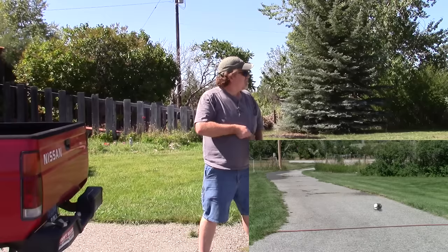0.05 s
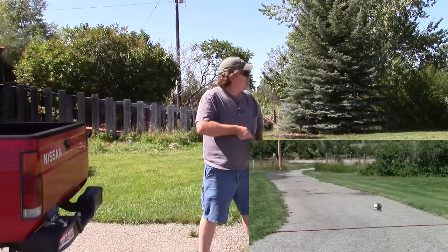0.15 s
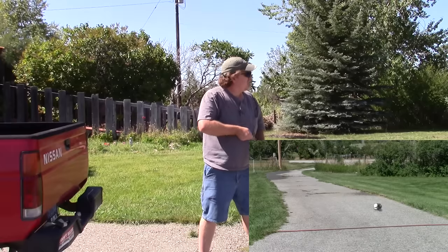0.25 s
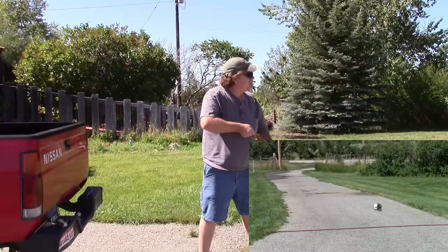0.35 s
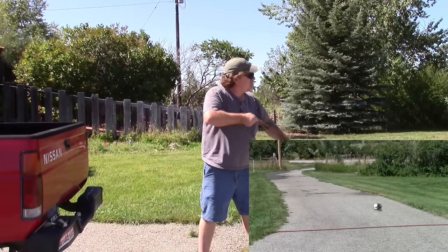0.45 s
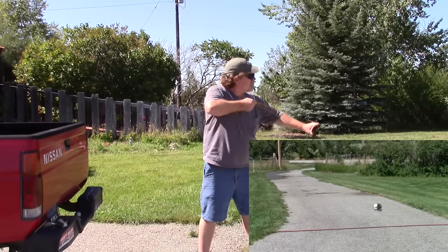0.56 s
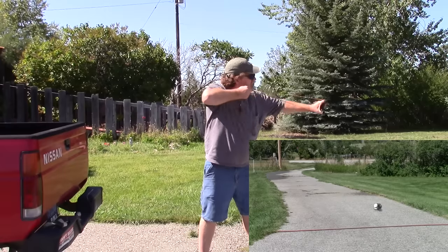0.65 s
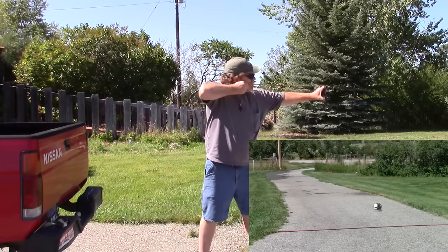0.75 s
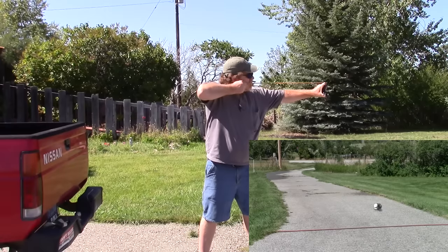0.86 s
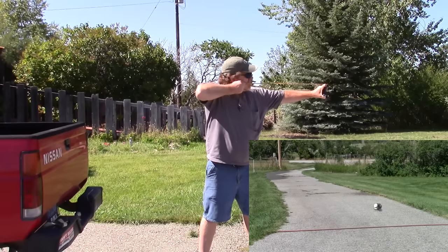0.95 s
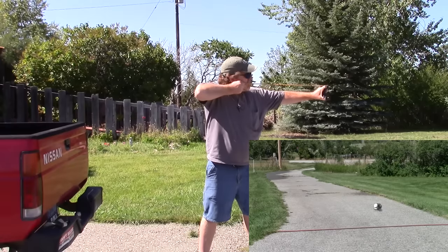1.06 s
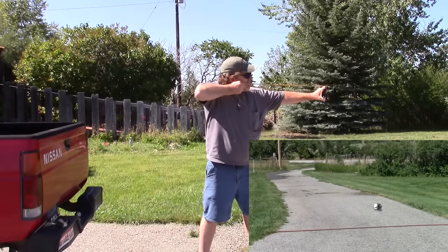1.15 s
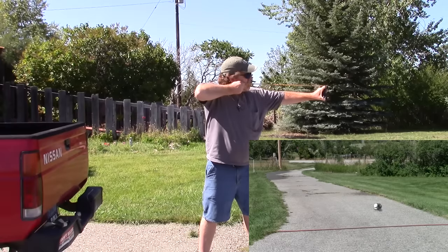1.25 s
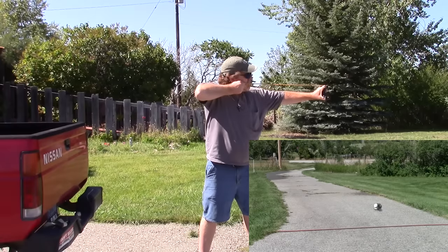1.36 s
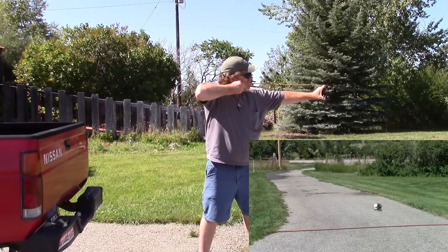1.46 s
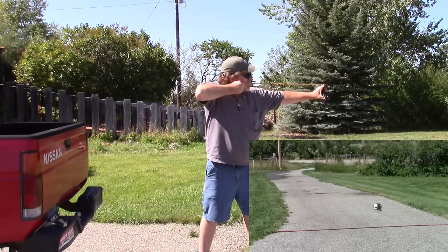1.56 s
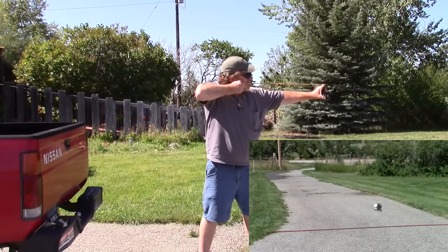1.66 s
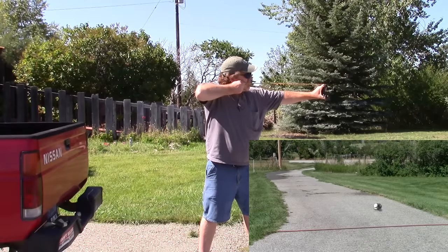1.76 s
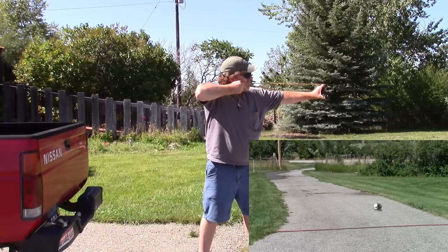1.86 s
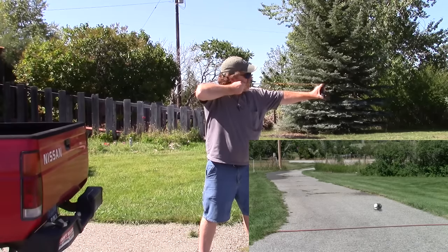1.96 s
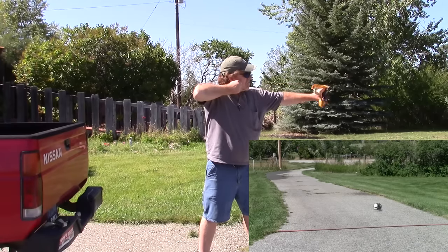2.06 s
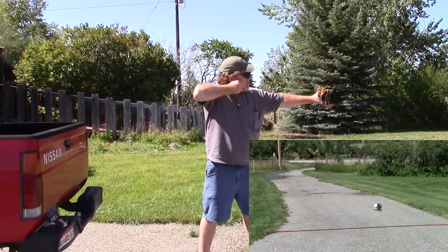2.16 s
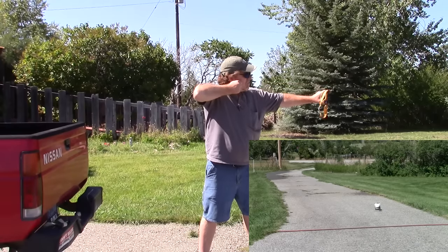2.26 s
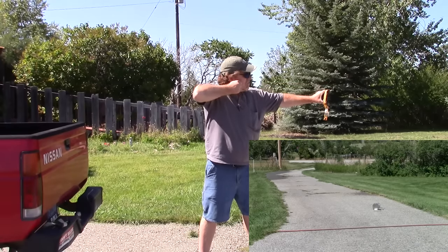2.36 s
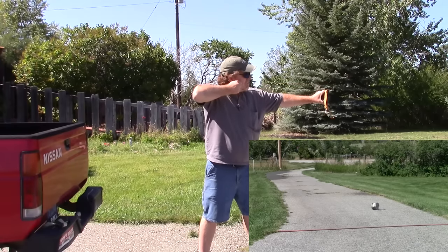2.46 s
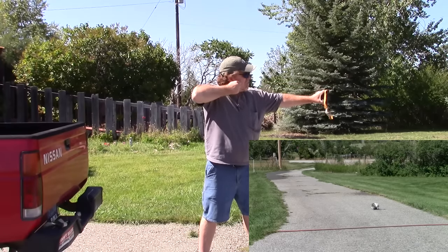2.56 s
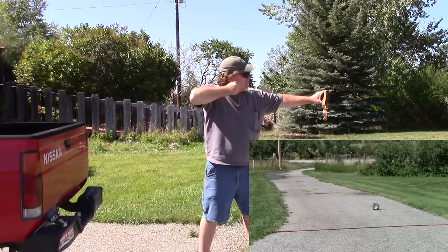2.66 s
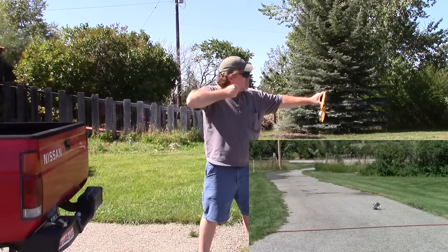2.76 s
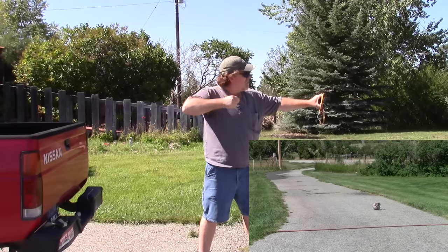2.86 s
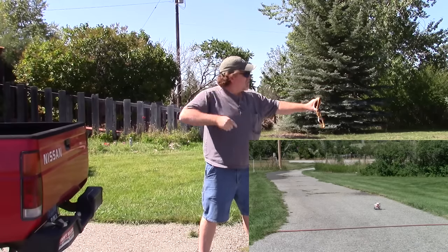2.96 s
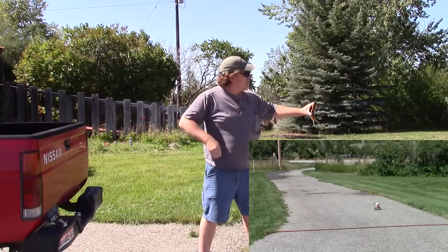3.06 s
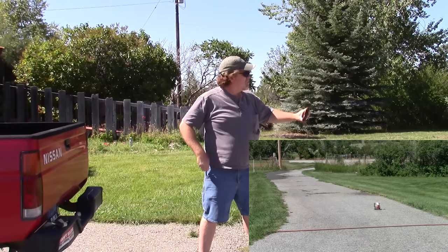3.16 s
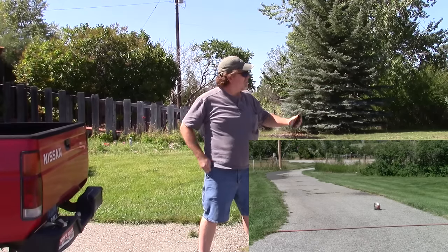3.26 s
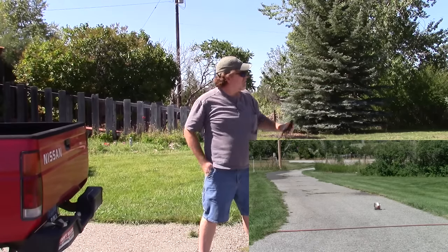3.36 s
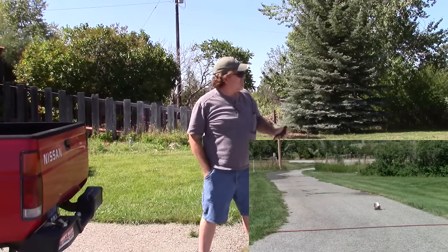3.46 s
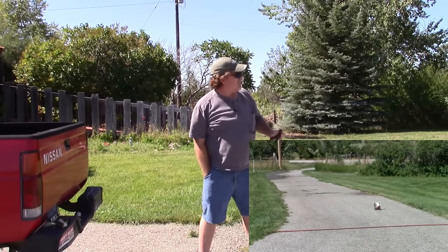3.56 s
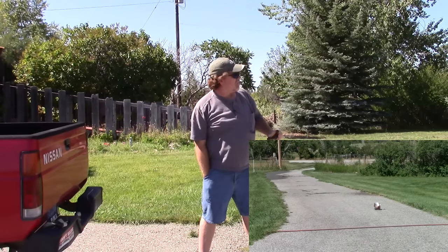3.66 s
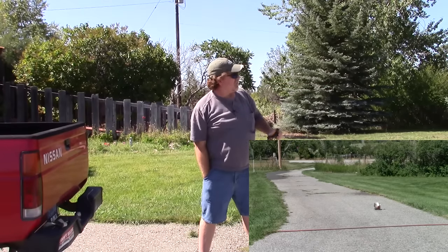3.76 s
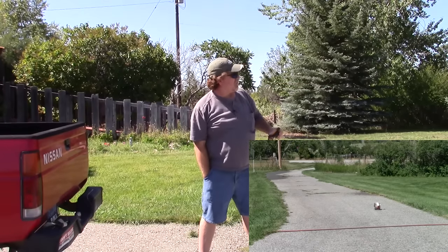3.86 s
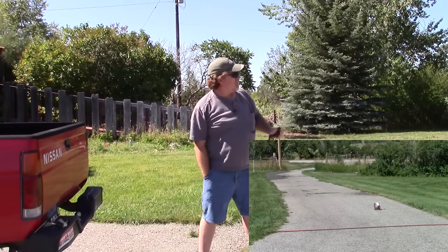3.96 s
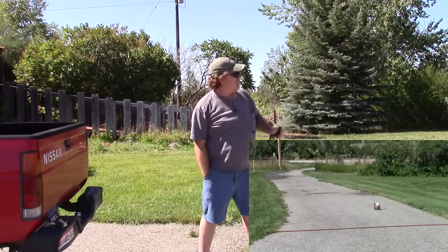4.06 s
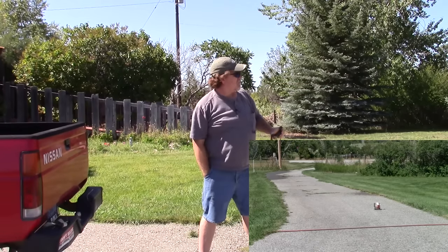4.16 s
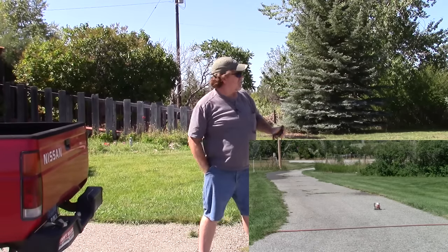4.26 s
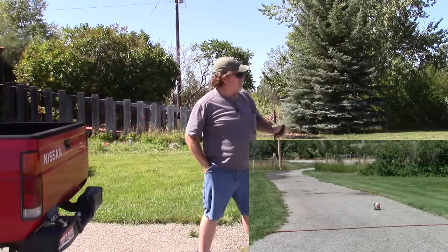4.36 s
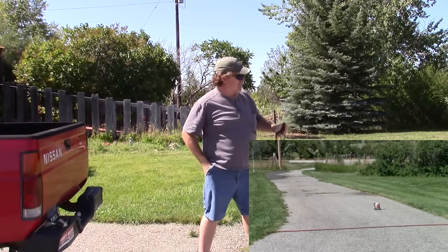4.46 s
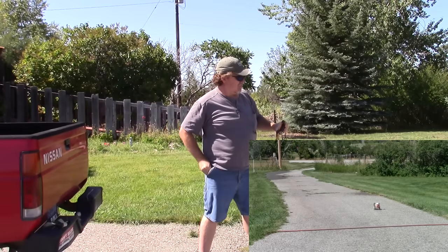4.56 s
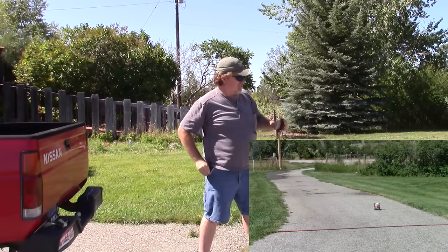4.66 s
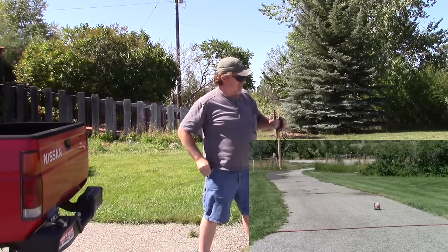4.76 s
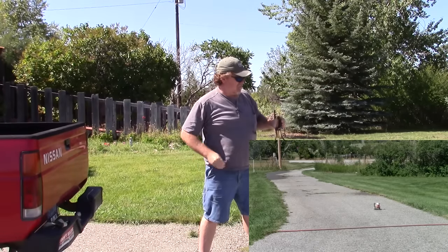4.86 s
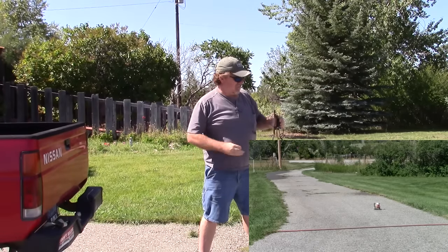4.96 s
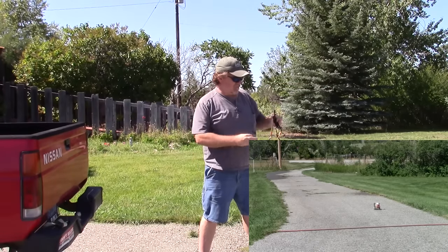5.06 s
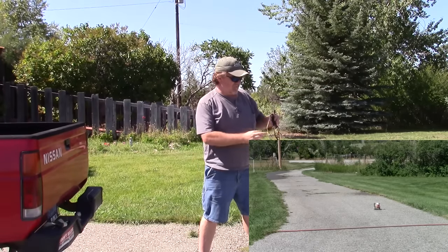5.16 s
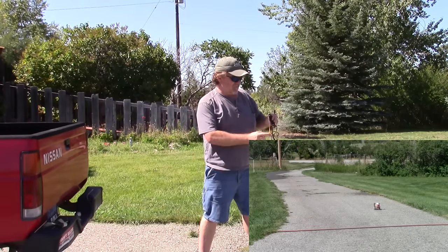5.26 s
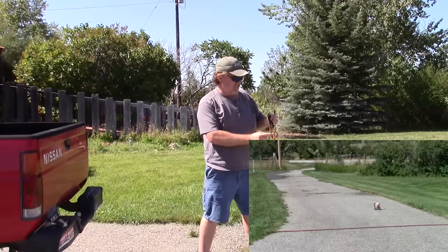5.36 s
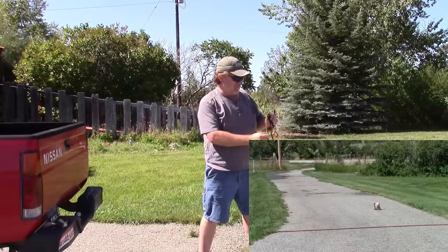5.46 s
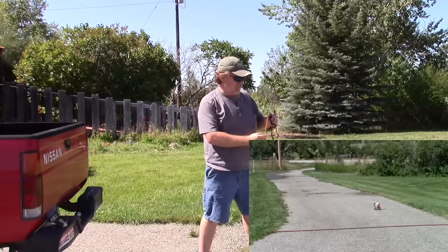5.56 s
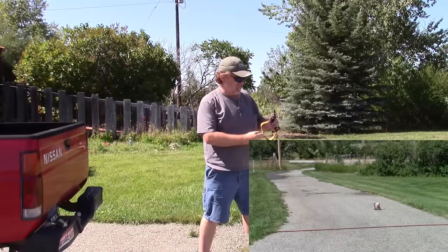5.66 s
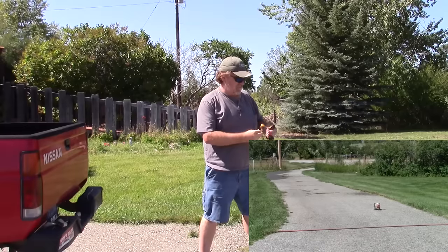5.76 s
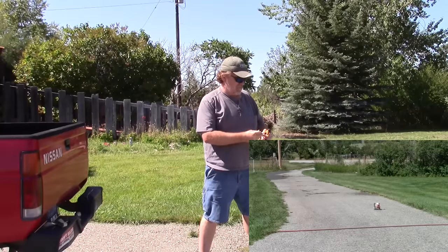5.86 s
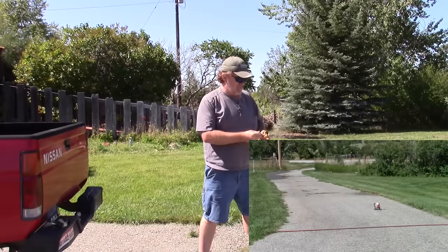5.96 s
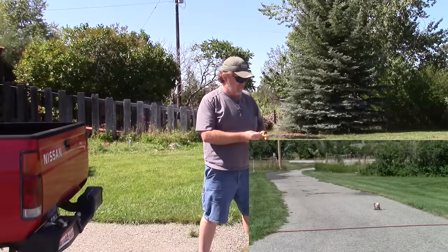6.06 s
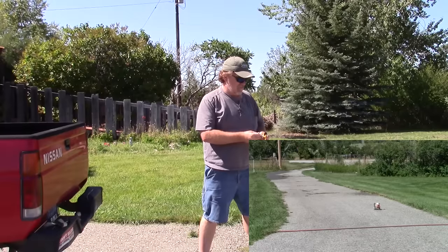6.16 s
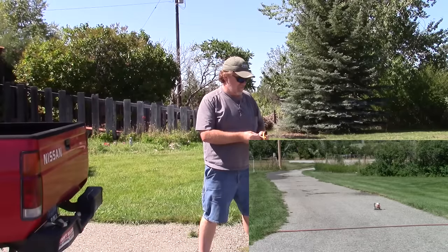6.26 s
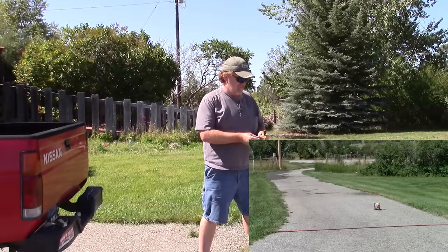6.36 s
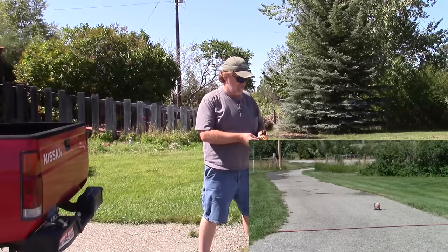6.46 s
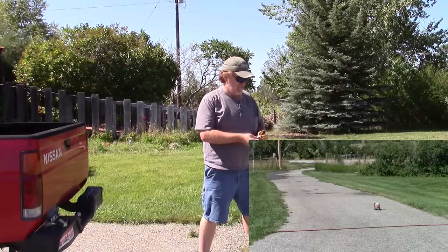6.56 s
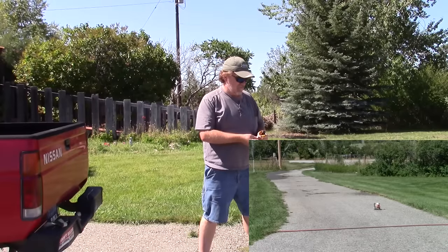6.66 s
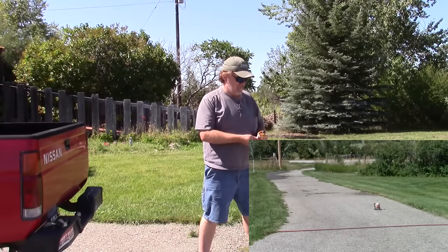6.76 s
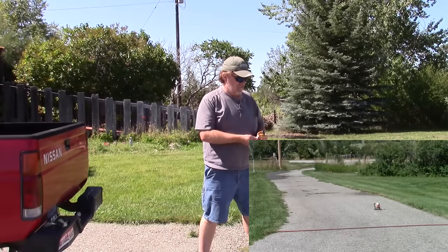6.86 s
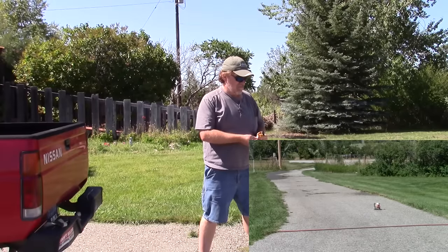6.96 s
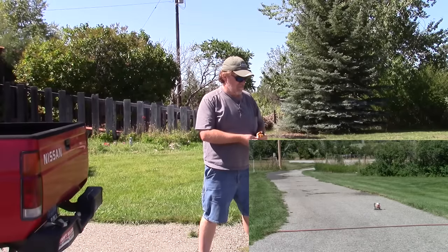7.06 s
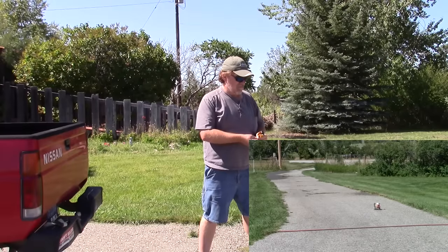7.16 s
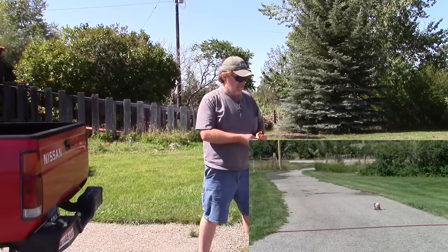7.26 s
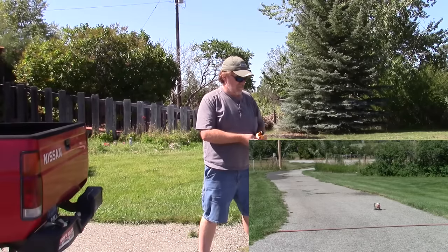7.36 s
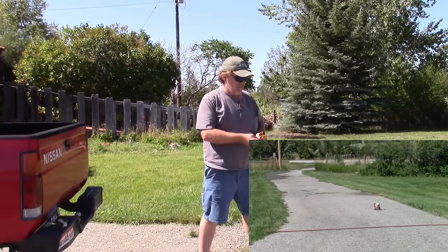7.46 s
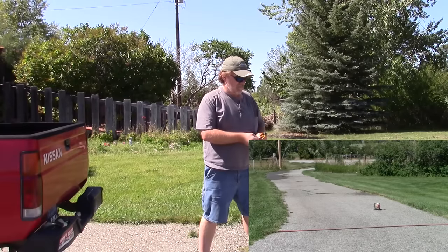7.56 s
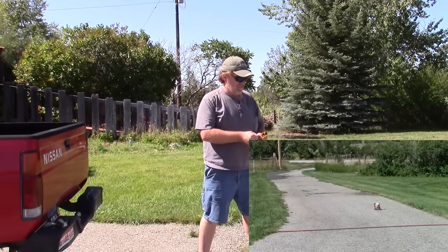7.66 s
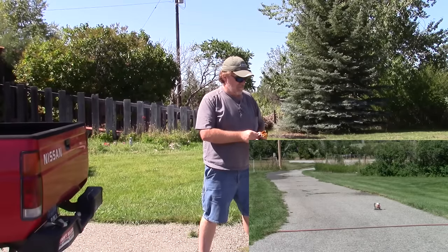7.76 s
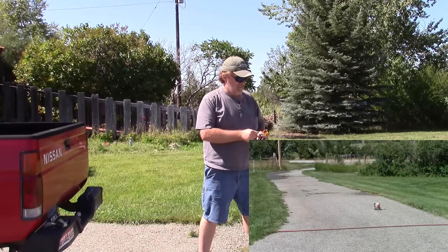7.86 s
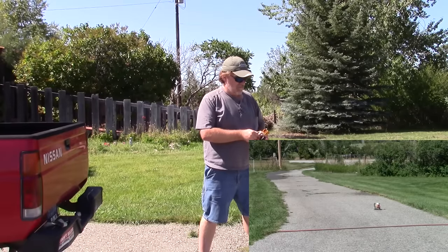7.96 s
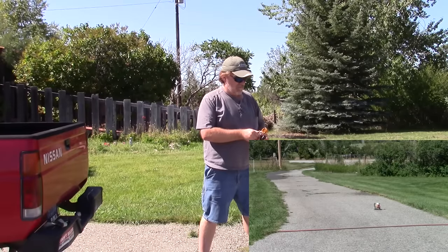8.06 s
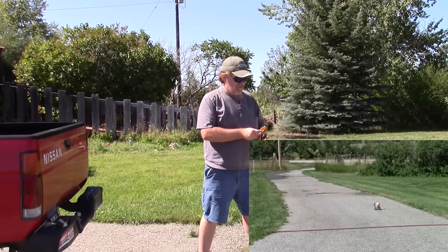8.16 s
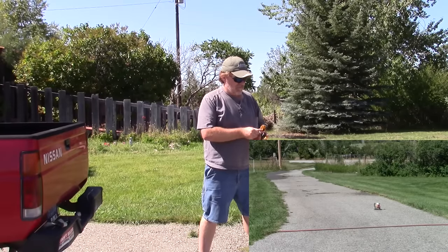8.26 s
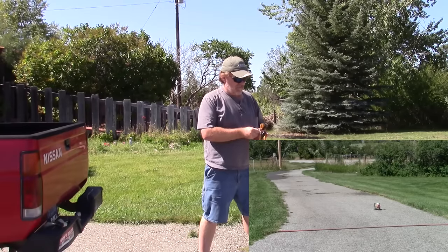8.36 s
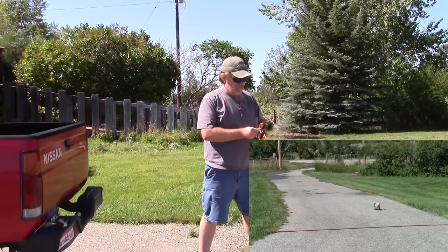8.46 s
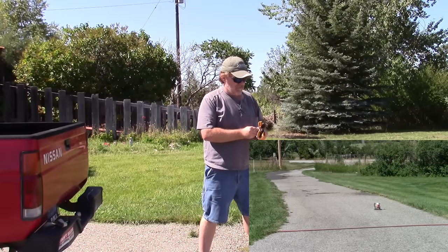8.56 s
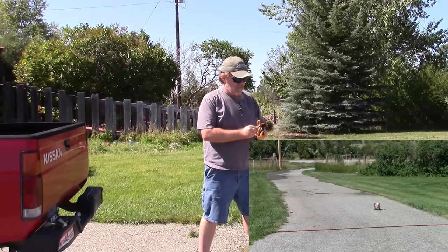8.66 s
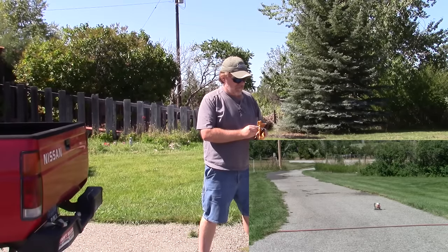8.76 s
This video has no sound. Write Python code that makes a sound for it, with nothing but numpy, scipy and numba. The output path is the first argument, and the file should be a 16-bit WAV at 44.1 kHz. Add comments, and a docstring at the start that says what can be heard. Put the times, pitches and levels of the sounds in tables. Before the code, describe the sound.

In a garden, an impact sprinkler ticks softly and quickly while a distant vehicle rumbles away. About two seconds in, a slingshot fires close to the microphone with a loud crack and slap. The shot clangs against a thin metal can, which tumbles and rocks to rest on the driveway. The background dips and slowly returns, with faint bird twittering, slight rustling and a few low puffs of wind.

```python
"""An impact sprinkler ticks in a garden, over the rumble of a vehicle driving off along a distant road.
Two seconds in, a slingshot fires close to the microphone: the bands crack and the pouch slaps. The shot
hits a can on the drive, whose thin shell rings as it tumbles and rocks to rest. The crack overloads the
input, and the gain control ducks and slowly recovers. The sprinkler ticks on, with faint twittering
far off, a little handling rustle and a few puffs of wind on the microphone."""
import sys
import numpy as np
from scipy import signal
from scipy.fft import rfft, irfft, next_fast_len
from scipy.io import wavfile
from scipy.ndimage import uniform_filter1d
from numba import njit

SR = 44100
rng = np.random.default_rng(int(sys.argv[2]) if len(sys.argv) > 2 else 0)


def inscribe(sig):
    """Save sig as 16-bit PCM at rate SR to the path in sys.argv[1].

    A 1-D sig is mono; a 2-D sig holds one channel per row.
    Samples are clipped to [-1, 1] before scaling.
    """
    pcm = np.round(np.clip(np.atleast_2d(sig).T, -1, 1) * 32767)
    wavfile.write(sys.argv[1], SR, pcm.astype(np.int16))


N = 388962
TIME = np.arange(N) / SR
AFTER = TIME[:SR // 2]  # time since a blow

# Levels in the tables are relative, ahead of the gain control.
# modes of the bands' crack: pitch_hz, level_db, t60_s
CRACK_MODES = [(19, -15, 0.23), (59, -17.5, .045), (406, -17, 0.026), (1024, -10.5, .012),
               (2010, 4, 0.0061), (3600, 8.5, 0.0032), (7400, -6.5, 0.0023)]
# pouch and bands flapping against fork and hand, then a few later thuds of another kind: start_s, level_db,
# t60_s, cutoff_hz
SLAPS_AND_THUDS = [(2.0255, -35, 0.004, 11970), (2.039, -43, 0.025, 11810), (2.0729, 1.5, 0.034, 15700),
                   (2.0845, -15.5, .008, 12000), (2.0897, -21, .09, 3800), (2.114, -24.5, 0.0088, 4000),
                   (2.171, -30, 0.015, 9000), (2.197, -39, 0.016, 4010), (2.931, -30.5, 0.018, 550),
                   (2.966, -38, 0.021, 3970), (2.973, -32, .02, 702), (4.414, -41, 0.047, 597)]
# the can is struck, then bounces: start_s, level_db, wall_note_db, crunch_db
CAN_KNOCKS = [(2.3385, 0, 7.5, 4.5), (2.385, -31, -20, 16), (2.412, -13.5, -24, -31),
              (2.504, -10, -25, -22), (2.5725, -15, 1.5, -17), (2.624, -22.5, -18, -16),
              (2.6545, -23, -17, -13), (3.178, -23.5, 4, -19), (3.211, -26, 4, -16),
              (3.234, -28.5, -15, -14)]
# modes of the can's shell: pitch_hz, level_db, t60_s
CAN_MODES = [(495, -9, 0.091), (518, -6, 0.063), (563, -1.5, 0.075), (851, -10.5, 0.13), (974, -17, 0.14),
             (1057, -16, 0.14), (1234, -20.5, 0.13), (1456, -13, .09), (1554, -25, 0.27), (1690, -20, 0.21),
             (2060, -28, 0.16), (2350, -30, 0.24), (2350, -15, 0.12), (2780, -26, 0.085),
             (2980, -21, 0.097), (4250, -31, .14), (5370, -15.5, 0.054)]
# sprinkler strokes as the jet turns away and back: time_s, level_db
STROKE_LEVELS = [(0, -39.5), (2, -42.5), (3.6, -39), (8.8, -38.5)]
# resonances of the sprinkler head: pitch_hz, width_hz, level_db
HEAD_MODES = [(2870, 92, -4.5), (3050, 60, 5), (3570, 27, -8.5), (4770, 80, 0.5), (4680, 77, 0.5),
              (5307, 25, 3), (5500, 46, 1), (5700, 69, 0), (6260, 67, -1.5), (7480, 40, -6)]
# tyre roar sinking into that of other roads: time_s, level_db, centre_hz
TYRE_ROAR = [(0, -39.5, 1064), (.15, -37.5, 1010), (.38, -41.5, 1090), (.68, -40, 865), (.88, -40, 1230),
             (1.15, -44, 1230), (1.68, -47.5, 740), (1.92, -43, 880), (2.85, -52, 836), (4.6, -53, 888),
             (5.2, -55, 910), (8.8, -54.5, 840)]
# wind buffeting the microphone: peak_s, level_db
WIND_PUFFS = [(0.80, -24), (0.984, -29), (5.99, -34), (6.558, -36.5), (7.046, -39.5)]
# bands and clothing being handled: peak_s, half_width_s, level_db, centre_hz
HANDLING_RUBS = [(0.5, .25, -59, 3990), (0.602, 0.055, -54.5, 8800), (0.705, 0.041, -54.5, 10500),
                 (6.05, .06, -65, 6930), (8.78, 0.041, -60, 9000)]

# noise spectra, each with the columns: frequency_hz, density_db
SLAP_SPECTRUM = [(60, 2.5), (330, -0.5), (1000, 3.5), (2000, -6), (3500, -2), (5300, -5), (6300, 5.5),
                 (8000, 0), (11000, -4), (16000, -8.5)]  # leather and rubber
CRUNCH_SPECTRUM = [(250, -12.5), (500, 10), (1100, -6), (1600, 5.5), (2400, 2.5), (3400, -4), (4200, -10.5),
                   (5400, -9.5), (9000, -16), (15000, -33)]  # crumpling metal
JET_SPECTRUM = [(600, -27.5), (1300, -2), (2200, -14.5), (2500, -3.5), (3100, -3), (4100, -6.5), (5400, -3),
                (7000, -4), (9800, -10.5), (10800, -15.5), (15500, -24)]  # water jet on the arm
SPRAY_SPECTRUM = [(1000, -12), (2200, -3), (2900, 0), (4000, -3.5), (6800, -3.5), (9000, -9.5), (12000, -9),
                  (16000, -7.5)]  # airborne spray
PATTER_SPECTRUM = [(1800, -23.5), (2600, 1), (3100, 2.5), (4000, -8), (5500, -4.5), (7500, -2), (9500, -12),
                   (15000, -24)]  # water on leaves
RUSTLE_SPECTRUM = [(1500, -12.5), (3500, -2), (6000, -1), (9500, 0), (12000, -8), (16000, -13.5)]  # cloth, also single drops
ENGINE_SPECTRUM = [(15, -4.5), (35, -2.5), (65, -2), (120, -1), (190, -3), (280, -12.5), (450, -25.5),
                   (900, -56.5)]  # distant engine
TYRE_SPECTRUM = [(200, -24.5), (400, -7.5), (600, 0), (900, -5.5), (1400, -3.5), (1800, -9.5),
                 (2300, -15.5), (4000, -27.5), (9000, -41)]  # tyres on the road
DRONE_SPECTRUM = [(15, -0.5), (40, 2), (62, 2), (100, 1.5), (135, -10.5), (200, -17), (320, -25),
                  (480, -21.5), (800, -34), (2000, -57.5)]  # far roads and breeze


def band_crack(start_s=2.0604, level_db=4):
    """Close to the microphone the bands whip past the fork: a ringing crack, hiss and a push of air."""
    body = sum((-1) ** k * undb(db) * ring(hz, t60) for k, (hz, db, t60) in enumerate(CRACK_MODES))
    attack = 1 - np.exp(-AFTER / .00032)
    hiss = noise(SLAP_SPECTRUM, len(AFTER)) * (undb(-6) * fade(.004) + undb(-22.5) * fade(.036))
    out = np.zeros(N)
    add(out, start_s, undb(level_db) * (body * attack + hiss))
    return out


def slaps_and_thuds(grain_db=3.5):
    """Leather and rubber smack: short, broad bursts that crackle as the folds close; a few duller thuds follow
    later."""
    out = np.zeros(N)
    for start_s, db, t60, cutoff_hz in SLAPS_AND_THUDS:
        folds = undb(grain_db * walk(1200)[:len(AFTER)])
        burst = lowpass(noise(SLAP_SPECTRUM, len(AFTER)) * folds, cutoff_hz)
        add(out, start_s, undb(db) * unit(burst) * fade(t60))
    return out


def can(wall_hz=684, dented_hz=722, strike_cutoff_hz=8960, bounce_cutoff_hz=880):
    """Out on the drive each knock rings and crunches the thin shell; the dent raises the wall's note."""
    out = np.zeros(N)
    for k, (start_s, db, wall_db, crunch_db) in enumerate(CAN_KNOCKS):
        bounce = k > 0
        # every bounce lands on another spot, which reweights and shifts the modes
        spot = rng.standard_normal((len(CAN_MODES), 2)) * bounce
        shell = sum(undb(mode_db + 3 * weight) * ring(hz * (1 + .015 * shift), t60)
                    for (hz, mode_db, t60), (weight, shift) in zip(CAN_MODES, spot))
        wall = undb(wall_db - 11.5) * ring(dented_hz if bounce else wall_hz, t60=.3)
        crunch = undb(crunch_db) * noise(CRUNCH_SPECTRUM, len(AFTER)) * fade(.033)
        clang = lowpass(shell + wall, bounce_cutoff_hz if bounce else strike_cutoff_hz)
        give = 1 - np.exp(-AFTER / .0023)  # the shell gives before it springs back
        add(out, start_s, undb(db) * give * (clang + crunch))
    # so small a body radiates little bass
    return signal.sosfilt(signal.butter(4, 335, "high", fs=SR, output="sos"), out)


def sprinkler(first_s=.0262, period_s=.13506, gained_s=.0146, settle_strokes=10):
    """The arm splashes once as it cuts into the jet and again as it strikes the head, amid spray."""
    stroke_db, = curves(STROKE_LEVELS)
    count = np.arange(int(N / SR / period_s) + 1)
    # the arm starts a little fast and settles into an even beat
    starts = first_s + period_s * count - gained_s * (1 - np.exp(-count / settle_strokes))
    strokes = np.zeros(N)
    for start_s in starts:
        force, lag, rebound = rng.standard_normal(3)
        second_splash = undb(-7.5 + .91 * rebound) * fade(.064, delay_s=.007 + .00036 * lag)
        add(strokes, start_s, undb(.54 * force) * (fade(.025) + second_splash))
    jet = noise(JET_SPECTRUM) * uniform_filter1d(strokes, size=70) * undb(stroke_db)
    # the head rings at the same pitches, but no two strokes excite them alike
    head = sum(undb(db + 3.7 * walk(11)) * resonate(jet, np.full(N, float(hz)), float(width))
               for hz, width, db in HEAD_MODES)
    # reflections from the ground nearby comb the splash
    ticks = garden(jet + .55 * head, wet_db=-6.5, t60=.05, cutoff_hz=18000, delay_s=.00078)
    return ticks + spray(stroke_db - 25)


def spray(level_db, drops_per_s=14):
    """Flung water hisses, then lands on the leaves in uneven showers and single drops."""
    hiss = noise(SPRAY_SPECTRUM) * undb(level_db + .63 * walk(50))
    showers = noise(PATTER_SPECTRUM) * undb(level_db - 8 + 6.4 * walk(38))
    landings = (rng.random(N) < drops_per_s / SR) * undb(3.5 * rng.standard_normal(N))
    splats = signal.fftconvolve(landings, fade(.0072))[:N]
    drops = splats * noise(RUSTLE_SPECTRUM) * undb(level_db + 7.5)
    return hiss + showers + drops


def vehicle(passes_s=.2, nearest_m=12, speed_m_s=13):
    """Engine rumble recedes along a straight road, under a tyre roar whose centre drifts."""
    nearness = nearest_m / np.hypot(nearest_m, speed_m_s * (TIME - passes_s))
    tyre_db, centre_hz = curves(TYRE_ROAR)
    roll = noise(TYRE_SPECTRUM)
    focus = unit(resonate(resonate(noise(TYRE_SPECTRUM), centre_hz, 480.), centre_hz, 480.))
    roar = unit(focus + .85 * roll)
    # a reflection lags ever more as the vehicle moves, sweeping notches down the roar
    lag_s = .00092 * np.exp(.6 * TIME)
    echo = np.interp(TIME - lag_s, TIME, roar)
    roar = unit(roar + .32 * nearness * echo)
    engine = noise(ENGINE_SPECTRUM) * undb(-35.5 + 21.5 * np.log10(nearness) + 1.8 * walk(12))
    return engine + roar * undb(tyre_db + .95 * walk(18))


def wind(half_width_s=.03):
    """Soft, low buffets right on the microphone."""
    rumble = noise([(15, 2), (60, 1), (130, -10), (300, -34), (1500, -74)])
    return rumble * sum(swell(peak_s, half_width_s, db) for peak_s, db in WIND_PUFFS)


def handling(slip_db=6):
    """Rubber and cloth stick and slip as they slide, each rub with its own brightness."""
    rub = noise(RUSTLE_SPECTRUM) * undb(slip_db * walk(220))
    return sum(unit(resonate(rub, np.full(N, float(hz)), .5 * hz)) * swell(peak_s, half_width_s, db)
               for peak_s, half_width_s, db, hz in HANDLING_RUBS)


def twitter(pitch_hz=2900, scatter_hz=200, chirps_per_s=17):
    """Quick, husky chirps, each at its own pitch, blurred by distance; one bout is louder."""
    out = np.zeros(N)
    envelope = fade(.05) * (1 - np.exp(-AFTER / .006))
    for k, (lag, shift, force) in enumerate(rng.standard_normal((int(chirps_per_s * N / SR), 3))):
        centre_hz = np.full(len(AFTER), pitch_hz + scatter_hz * shift)
        note = resonate(rng.standard_normal(len(AFTER)), centre_hz, 350.)
        add(out, (k + .3 * lag) / chirps_per_s, undb(2.1 * force) * note * envelope)
    distant = unit(garden(out, wet_db=-6.5, t60=.25, cutoff_hz=5000))
    return distant * (undb(-78) + swell(peak_s=5.9, half_width_s=.55, db=-64))


def far_drone(level_db=-47.5):
    """Far-off roads and breeze, still there when the vehicle has gone."""
    return noise(DRONE_SPECTRUM) * undb(level_db + 2.4 * walk(7))


def garden(x, wet_db, t60, cutoff_hz, delay_s=.006):
    """Direct sound reaches the microphone first, then scatter from ground, fence and trees."""
    scatter = lowpass(rng.standard_normal(len(AFTER)), cutoff_hz) * fade(t60, delay_s)
    scatter /= np.sqrt(np.sum(scatter ** 2))
    return x + undb(wet_db) * signal.fftconvolve(x, scatter)[:N]


def undb(db):
    """Decibels to gain."""
    return 10 ** (np.asarray(db) / 20)


def curves(rows):
    """Each column after the first, joined by straight lines in time."""
    times, *columns = np.transpose(rows)
    return [np.interp(TIME, times, column) for column in columns]


def unit(x):
    """Scale to rms 1."""
    return x / np.sqrt(np.mean(x ** 2))


def noise(spectrum, size=N):
    """Noise of rms 1 with the given spectrum."""
    hz, db = np.transpose(spectrum)
    length = next_fast_len(size)
    bins_hz = np.fft.rfftfreq(length, 1 / SR) + 1
    gain = undb(np.interp(np.log(bins_hz), np.log(hz), db))
    return unit(irfft(rfft(rng.standard_normal(length)) * gain, length)[:size])


def walk(rate_hz):
    """A random wander through 2048 knots, spread near 1."""
    knots = rng.standard_normal(2048)
    return np.interp(TIME * rate_hz, np.arange(len(knots)), knots)


def swell(peak_s, half_width_s, db):
    """A bell-shaped rise and fall in level."""
    return undb(db) * np.exp(-((TIME - peak_s) / half_width_s) ** 2)


def fade(t60, delay_s=0):
    """Decay by 60 dB in t60 seconds, starting after a delay."""
    return np.exp(-np.log(1000) * np.abs(AFTER - delay_s) / t60) * (AFTER >= delay_s)


def ring(hz, t60):
    """One damped mode."""
    return np.sin(2 * np.pi * hz * AFTER) * fade(t60)


def lowpass(x, hz):
    """Two-pole treble roll-off."""
    return signal.sosfilt(signal.butter(2, hz, fs=SR, output="sos"), x)


def add(track, start_s, sound):
    """Mix a sound into a track at a time."""
    i = max(int(start_s * SR), 0)
    track[i:i + len(sound)] += sound[:max(N - i, 0)]


@njit
def resonate(x, centre_hz, width_hz):
    """State-variable band-pass whose centre can move."""
    y, band_state, low_state = np.empty(len(x)), 0., 0.
    for i in range(len(x)):
        tuning = np.tan(np.pi * centre_hz[i] / SR)
        damping = width_hz / centre_hz[i]
        band = (band_state + tuning * (x[i] - low_state)) / (1 + tuning * (tuning + damping))
        band_state = 2 * band - band_state
        low_state += 2 * tuning * band
        y[i] = damping * band
    return y


@njit
def follow(x, attack_s, release_s):
    """Level detector with separate rise and fall times."""
    y, level = np.empty(len(x)), 0.
    for i in range(len(x)):
        response_s = attack_s if abs(x[i]) > level else release_s
        level += (abs(x[i]) - level) / (SR * response_s)
        y[i] = level
    return y


def scene():
    """One microphone in the garden: slingshot and can over sprinkler, vehicle and breeze."""
    slingshot = garden(band_crack() + slaps_and_thuds(), wet_db=-23, t60=.19, cutoff_hz=11880)
    target = garden(can(), wet_db=-19.5, t60=.49, cutoff_hz=8000)
    return (slingshot + target + sprinkler() + twitter() + vehicle() + far_drone() + wind()
            + handling())[None]


def record(dry, threshold_db=-27, slope=.35, lag_s=.033, top_hz=15500):
    """Gain control ducks too late for the crack, which overloads the input; the gain then creeps back."""
    level = follow(dry[0], attack_s=.019, release_s=.7)
    excess = np.log(np.maximum(level / undb(threshold_db), 1))
    step = 1 / (lag_s * SR)
    lagged_excess = signal.lfilter([step], [1, step - 1], excess)
    gain = np.exp(-slope * lagged_excess)
    clipped = np.clip(dry * gain, -.95, .95)
    return signal.sosfilt(signal.ellip(8, .2, 70, top_hz, fs=SR, output="sos"), clipped)


dry = scene()
out = record(dry)
inscribe(out)
```